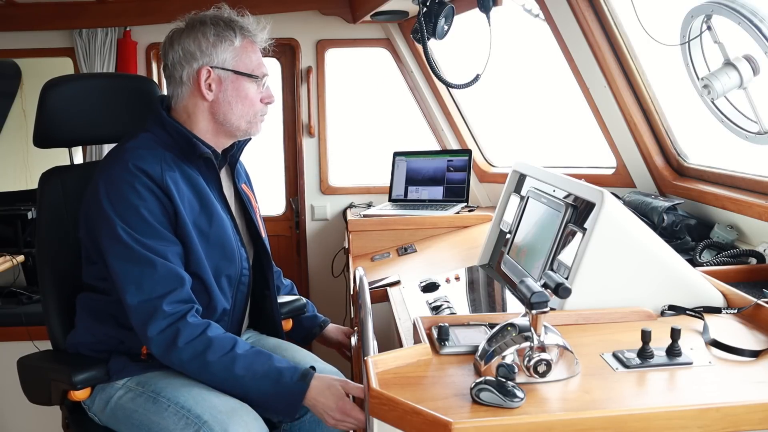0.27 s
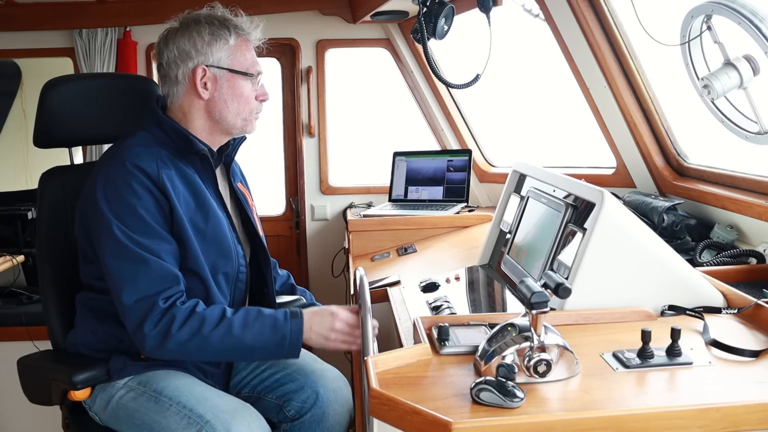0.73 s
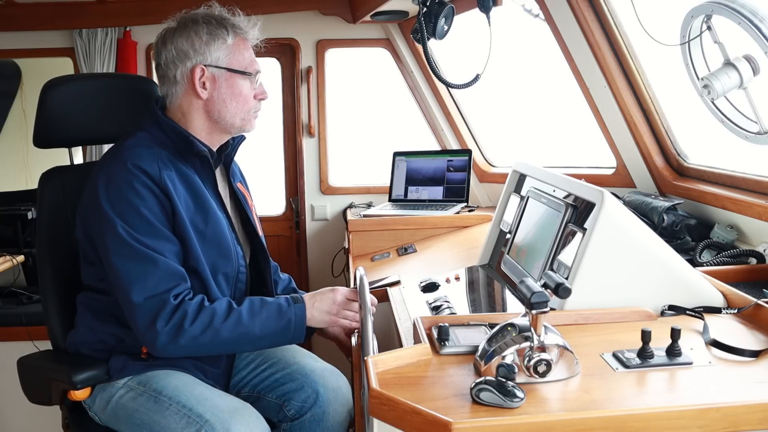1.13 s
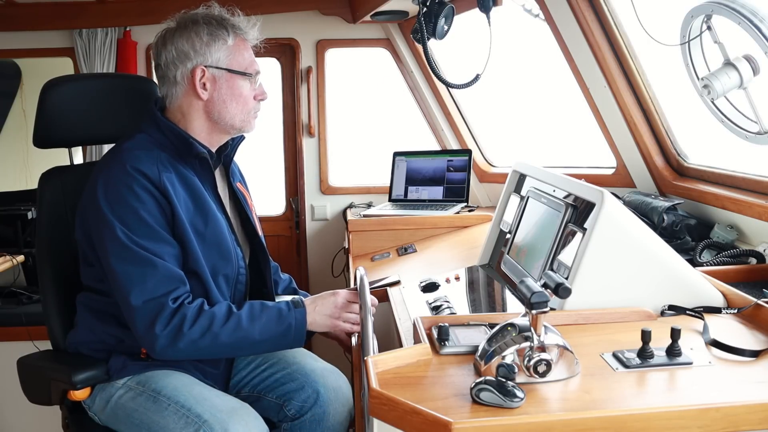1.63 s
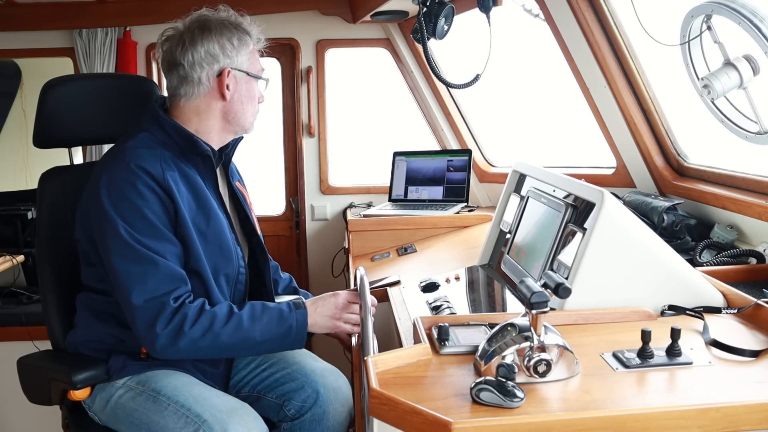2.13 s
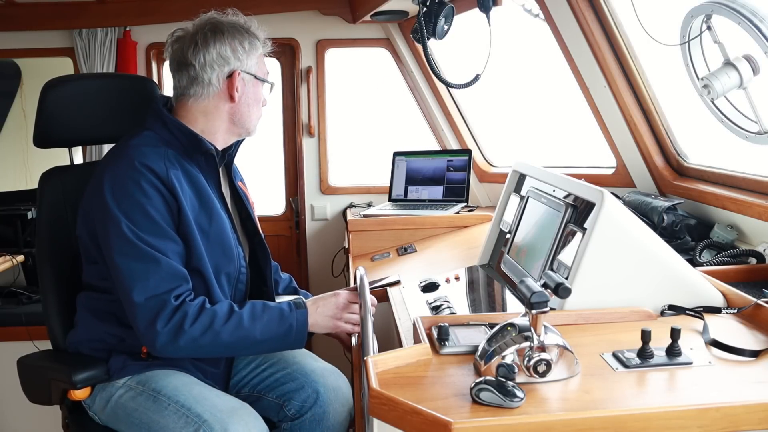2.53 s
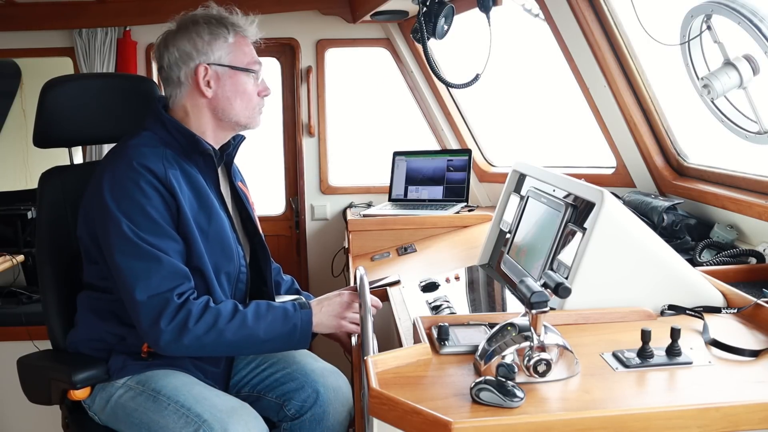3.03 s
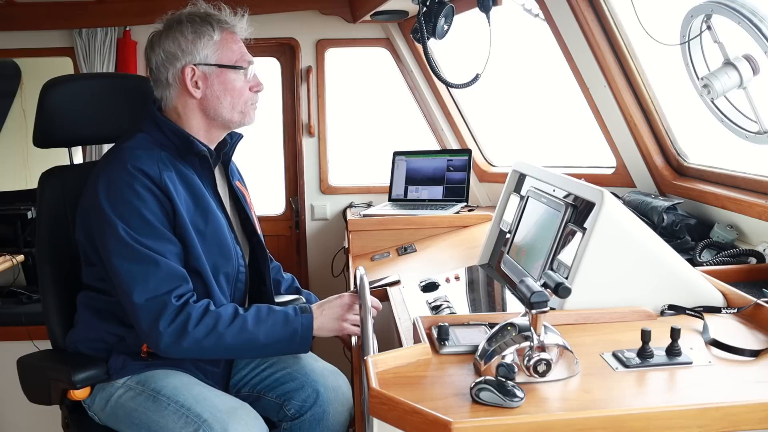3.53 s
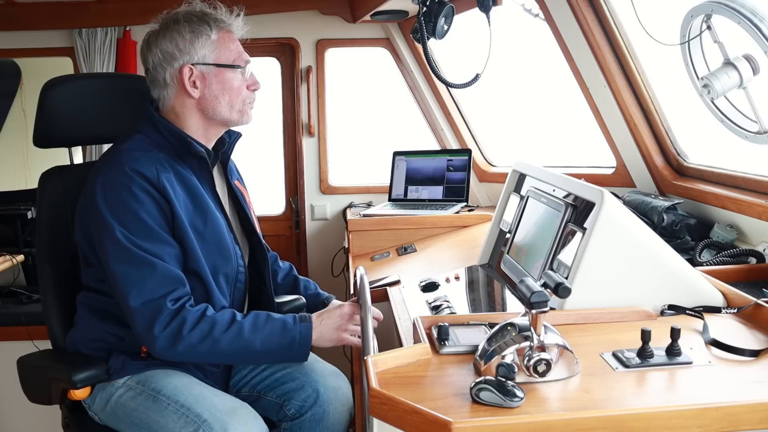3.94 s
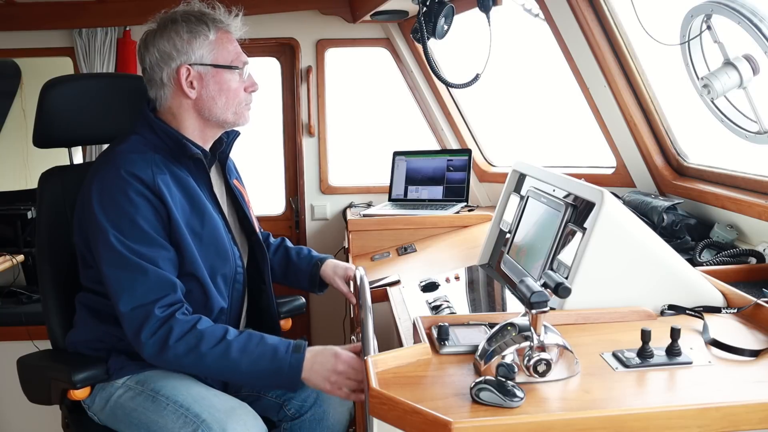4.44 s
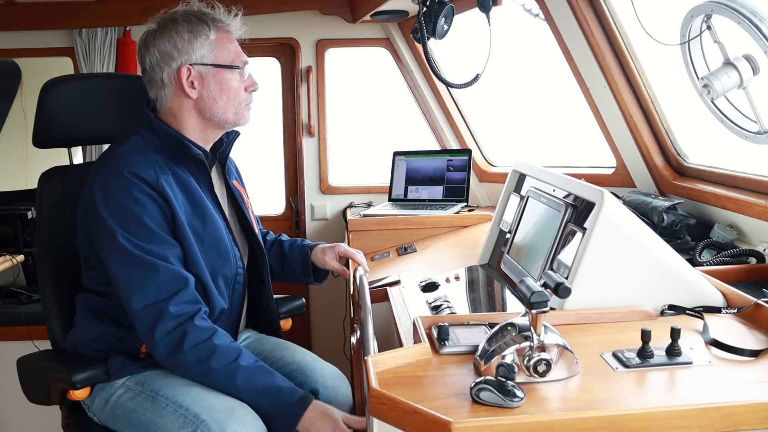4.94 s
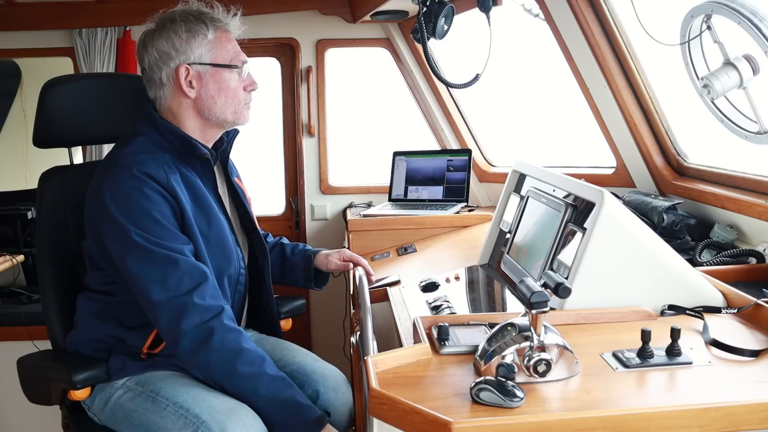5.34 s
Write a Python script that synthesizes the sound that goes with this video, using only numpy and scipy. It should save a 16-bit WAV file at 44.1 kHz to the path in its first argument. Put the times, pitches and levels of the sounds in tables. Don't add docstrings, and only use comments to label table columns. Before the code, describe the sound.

From 0 to about 2.8 seconds, the inside of a boat's wheelhouse: a diesel idles below the floor, a low pulsing hum with gear whines and hull rumble, surrounded by soft, smooth hiss of water and ventilation. A long dull knock opens the scene; a jacket sleeve swishes close to the microphone around 0.6 seconds, with a low knock at 0.75. At 2.85 an electric pump spins up on the roof with a rattling whir, alongside a small knock. At 3.05 the air horn bursts in, loud, brassy and rich in overtones, around middle C. It begins slightly sharp, settles almost at once, and the cabin walls change its colour. The background ducks abruptly. The note holds to the end near 5.5 seconds, with faint ticks near 3.7, 3.85 and 4.5, a slight softening around 4.65, a barely audible swish at 5.2 and a slight rise by 5.4.

```python
import sys
import numpy as np
from scipy import signal
from scipy.fft import rfft, irfft, next_fast_len
from scipy.io import wavfile
from scipy.ndimage import map_coordinates

SR = 44100
rng = np.random.default_rng(int(sys.argv[2]) if len(sys.argv) > 2 else 0)


def boost(x):
    u = np.asarray(x, float) / 20
    return 10 ** u


def generate_wav(signal):
    frames = np.transpose(np.atleast_2d(signal))
    scaled = np.clip(frames, -1, 1) * 32767
    pcm = np.round(scaled).astype(np.int16)
    wavfile.write(sys.argv[1], SR, pcm)


N = 245637
T = np.arange(N) / SR


def wobble(rate_hz):
    knots = rng.standard_normal(int(N * rate_hz / SR) + 4)
    return map_coordinates(knots, [T * rate_hz])


def settle(start_s, tau_s):
    return np.exp(-np.maximum(T - start_s, 0) / tau_s)


def swell(strokes):
    return sum(height * np.exp(-((T - middle_s) / length_s) ** 2) for middle_s, length_s, height in strokes)


def hiss(spectrum):
    size = next_fast_len(N + 8192)
    f, db = np.transpose(spectrum)
    bins_hz = np.fft.rfftfreq(size, 1 / SR)
    gain = boost(np.interp(np.log(bins_hz + 1), np.log(f + 1), db))
    noise = irfft(rfft(rng.standard_normal(size)) * gain, size)[:N]
    return noise / np.std(noise)


def tone(turns, db, scatter=1):
    return np.sqrt(2) * boost(db) * np.cos(2 * np.pi * (turns + scatter * rng.random()))


# [multiple of the cycle rate, level/dB]
ENGINE_ORDERS = [(3, -65), (6, -36), (10, -50.5), (11, -54), (12, -46), (16, -55), (18, -48.5), (21, -56.5),
                 (22, -49), (27, -53), (32, -54.5), (36, -60.5), (38, -56), (44, -59.5), (47, -53),
                 (54, -53.5)]
# [multiple of the shaft rate, level/dB]
SHAFT_ORDERS = [(3, -63), (5, -67), (6, -63), (64, -53), (65, -52.5), (66, -49.5), (68, -48)]
# [f/Hz, level/dB]
GEAR_WHINES = [(100.8, -52), (454.7, -54), (468.5, -48.5), (588, -53.5), (658, -65), (666.5, -55.5),
               (675, -57), (705.5, -58), (763.5, -64.5)]
# [f/Hz, level/dB per Hz]
HULL_COLOUR = [(12, -62.5), (20, -21.5), (40, -15.5), (70, -13.5), (100, -12.5), (172, -10), (240, -13),
               (389, -10.5), (459, -7.5), (503, -8.5), (677, -20), (760, -27), (1100, -30), (2000, -61)]
CYCLE_HZ, SHAFT_HZ = 8.79, 6.832


def engine():
    cycle = np.cumsum(CYCLE_HZ * (1 + .0012 * wobble(3))) / SR
    shaft_turns = cycle * SHAFT_HZ / CYCLE_HZ
    in_step = .45
    orders = sum(tone(k * cycle, db + (.25 + 0.016 * k) * wobble(4.4), in_step) for k, db in ENGINE_ORDERS)
    shaft = sum(tone(round(k) * shaft_turns, db + wobble(2.7), in_step) for k, db in SHAFT_ORDERS)
    whines = sum(tone(hz * T + 0.16 * wobble(2), db + 0.54 * wobble(5.4)) for hz, db in GEAR_WHINES)
    firing = np.cos(2 * np.pi * 6 * cycle)
    throb_db = .4 * firing + 1.3 * np.cos(2 * np.pi * cycle)
    hull = boost(-37.5 + throb_db) * hiss(HULL_COLOUR)
    return orders + shaft + whines + hull


# [f/Hz, level/dB per Hz]
WASH_COLOUR = [(400, -31), (750, -2.5), (1200, -6.5), (2200, -8), (3300, -14.5), (4500, -17.5),
               (6600, -21.5), (7500, -26.5), (9000, -28), (10000, -34.5), (13000, -36.5), (15600, -40.5)]


def wash():
    level_db = -44.5 + 0.28 * wobble(2.3) + 0.4 * wobble(8.6)
    return boost(level_db) * hiss(WASH_COLOUR)


# [t/s, level/dB, centre f/Hz, t60/s]
FITTING_TICKS = [
    (0.0, -44, 1800, .35),
    (0.742, -39, 1300, .14),
    (2.835, -61, 6500, .12),
    (2.865, -46, 1300, .15),
    (3.71, -44, 2300, .14),
    (3.848, -41.5, 2500, .25),
    (3.842, -58, 5800, .12),
    (4.494, -37, 2900, .07),
    (4.494, -57, 7500, .05),
]


def ticks():
    out = np.zeros(N + SR)
    t = T[:SR // 2]
    for start_s, db, hz, t60_s in FITTING_TICKS:
        soft_edge = 1 - np.exp(-t / .005)
        burst = rng.standard_normal(len(t)) * boost(-60 * t / t60_s) * soft_edge
        band = signal.butter(3, [hz / 1.5, hz * 1.5], "band", fs=SR, output="sos")
        out[round(start_s * SR):][:len(t)] += boost(db + 15) * signal.sosfilt(band, burst)
    return out[:N]


# [middle t/s, length/s, level/dB]
SLEEVE_STROKES = [
    (0.56, 0.12, -56.5),
    (0.76, 0.2, -62),
    (5.2, .19, -57),
]
# [f/Hz, level/dB per Hz]
CLOTH_COLOUR = [(800, -25), (2000, -7.5), (5000, -5), (8000, 1), (11000, -8), (15000, -15)]


def sleeve():
    strokes = swell([(middle_s, length_s, boost(db)) for middle_s, length_s, db in SLEEVE_STROKES])
    return strokes * boost(wobble(40)) * hiss(CLOTH_COLOUR)


# [f/Hz, level/dB per Hz]
ROOF_COLOUR = [(300, -40), (500, -3.5), (650, 3.5), (900, -7.5), (1300, 1.5), (1700, -4.5), (2500, -12),
               (4000, -22), (6000, -50.5)]
# [f/Hz, level/dB over the pump level]
MOTOR_LINES = [(495.5, -6.5), (545.5, 2), (595, 2.5), (644.5, -7.5), (694, -11.5), (881.5, -10),
               (1093, -15), (1193, -18.5), (1280, -11)]


def pump():
    on_s, spin_up_s, level_db, loaded_db = 2.845, 0.02, -43.5, 1.1
    lines = sum(tone(hz * T + .3 * wobble(3), db - 1 + 2.4 * wobble(7.2)) for hz, db in MOTOR_LINES)
    running = np.clip((T - 3.04) / .1, 0, 1)
    spin = 1 - settle(on_s, spin_up_s)
    return spin * boost(level_db + loaded_db * running) * (hiss(ROOF_COLOUR) + running * lines)


# [multiple of the pitch, first level/dB, change-over t/s, field level/dB, share of the sway]
HORN_PARTIALS = [(1, -22.5, 3.085, -27.5, 0.28), (2, -14, 3.08, -19, -.1), (3, -19, 3.072, -12, 0.03),
                 (4, -11, 3.108, -21, 1.2), (5, -22, 3.095, -16.5, 0.21), (6, -28, 3.07, -25.5, 1.6),
                 (7, -29.5, 3.088, -25.5, .2), (8, -35, 3.088, -29, .2), (9, -35.5, 3.088, -41, -1.5),
                 (10, -43, 2.9, -51, 3), (11, -39.5, 3.088, -41, -.1), (12, -38.5, 3.08, -41, -.1),
                 (13, -42.5, 3.085, -47.5, -2), (14, -47.5, 3.4, -46.5, -0.69), (15, -54, 3.09, -50.5, 0),
                 (16, -50, 3.085, -49.5, -0.23), (17, -50.5, 3.08, -74, 0), (18, -63, 3.085, -63, 3)]
OPPOSED = (3, 7, 8, 9, 11, 16, 18)
# [middle t/s, length/s, level/dB]
HELMSMAN_LEANS = [
    (4.65, .22, -1.5),
    (5.4, .22, .8),
]
# [multiple of the pitch, below level/dB, above level/dB]
STROKE_RIPPLE = [(3, -49, -47), (4, -48, -59), (5, -57.5, -64), (6, -58.5, -56), (7, -57, -64.5),
                 (8, -66, -72)]
# [f/Hz, level/dB per Hz]
JET_COLOUR = [(2500, -31), (4500, 1), (6500, -0.5), (9000, -2), (10500, -10), (15500, -15)]


def horn():
    speaks_s, growth_s = 3.048, 0.0067
    hold_hz, sharp_hz, settle_s, settle_width_s = 260.88, 6.6, 3.063, .027
    creep_hz, creep_s = .5, .15
    sway_from_db, sway_to_db, sway_s = 3.5, -0.96, .25
    leak_db, leak_from_db, leak_s = -58.5, -73.5, .5
    stroke_hz = 63

    air_db = -20 / np.log(10) * np.logaddexp(0, (speaks_s - T) / growth_s)
    sharp = .5 - .5 * np.tanh((T - settle_s) / (2 * settle_width_s))
    pitch_hz = hold_hz + sharp_hz * sharp + creep_hz * settle(settle_s, creep_s)
    turns = np.cumsum(pitch_hz + 0.098 * wobble(5) + .1 * wobble(40)) / SR
    sway_db = sway_to_db + (sway_from_db - sway_to_db) * settle(3.04, sway_s) + swell(HELMSMAN_LEANS)

    note = np.zeros(N)
    for k, first_db, change_s, field_db, share in HORN_PARTIALS:
        k = round(k)
        built = .5 + .5 * np.tanh((T - change_s) / 0.018)
        drift_db = share * sway_db + 0.099 * k * wobble(1.5) + 0.021 * k * wobble(25)
        flutter_db = .18 * k * wobble(60)
        sign = -1 if k in OPPOSED else 1
        first_wave = sign * (1 - built) * boost(first_db + flutter_db)
        field = built * boost(field_db + drift_db)
        pressure = boost(air_db * min(0.35 * k - .1, 1.15))
        spread = -.3 - 1.16 * k * k
        note += (first_wave + field) * np.sqrt(2) * pressure * np.cos(2 * np.pi * k * turns + spread)
    for k, below_db, above_db in STROKE_RIPPLE:
        note += tone(round(k) * turns - stroke_hz * T, air_db + below_db + wobble(2.4))
        note += tone(round(k) * turns + stroke_hz * T, air_db + above_db + wobble(6.3))
    jet_db = air_db + leak_db + (leak_from_db - leak_db) * settle(3.1, leak_s)
    return note + boost(jet_db) * hiss(JET_COLOUR)


def scene():
    return (engine() + wash() + ticks() + sleeve() + pump() + horn())[None]


def roll_off(x):
    return signal.sosfilt(signal.butter(12, 15700, fs=SR, output="sos"), x)


def record(dry):
    gain_db, duck_db, duck_at_s, duck_s = 1, -7, 3.047, 0.026
    ducked = dry * boost(gain_db + duck_db * (1 - settle(duck_at_s, duck_s)))
    return roll_off(ducked)


dry = scene()
out = record(dry)
generate_wav(out)
```